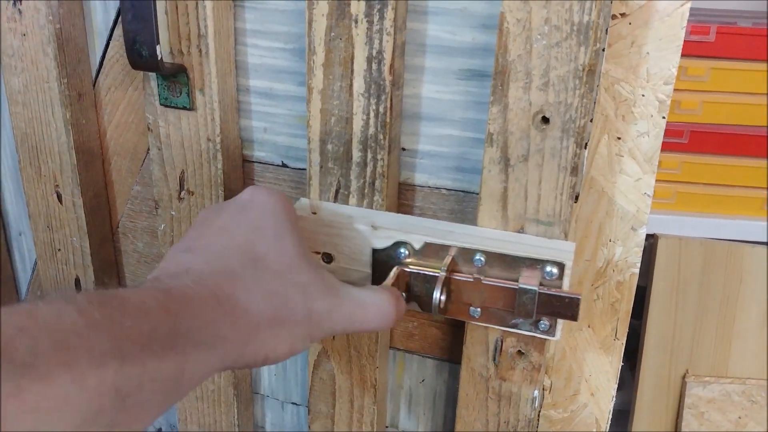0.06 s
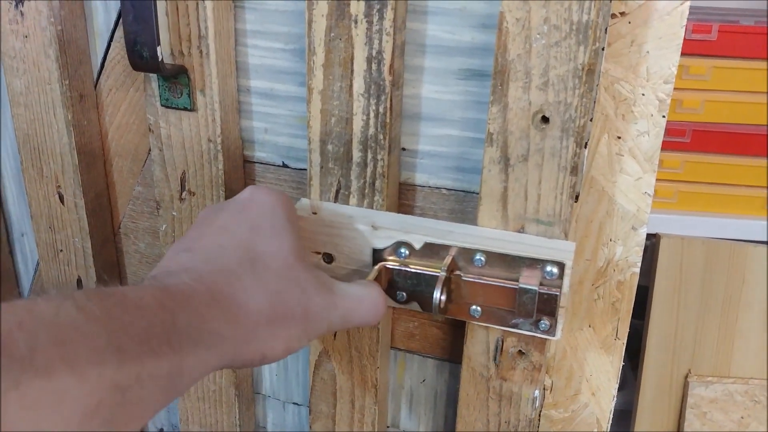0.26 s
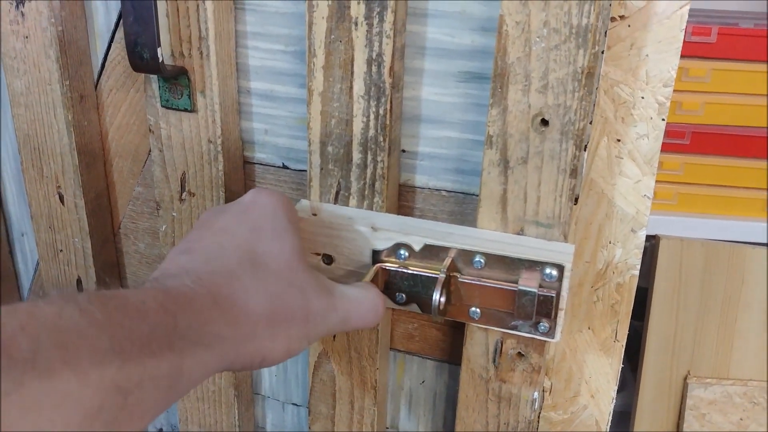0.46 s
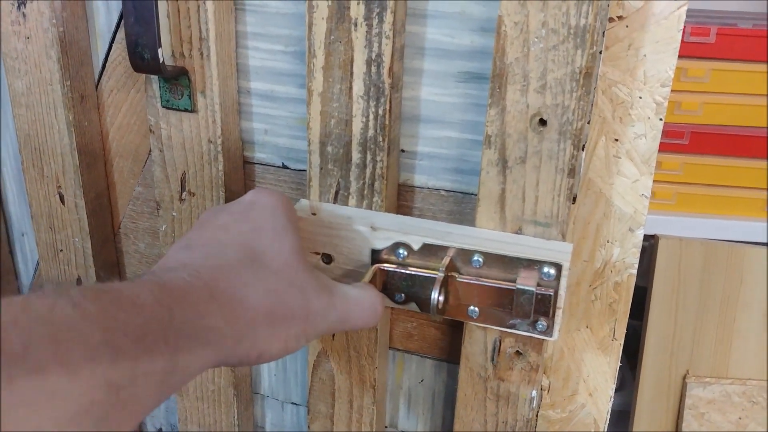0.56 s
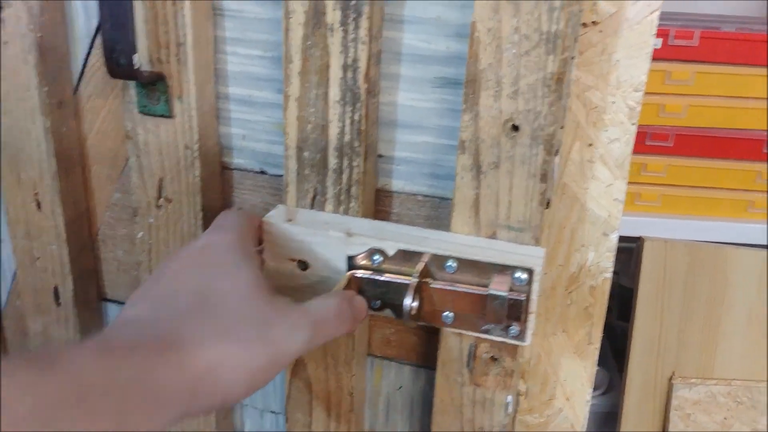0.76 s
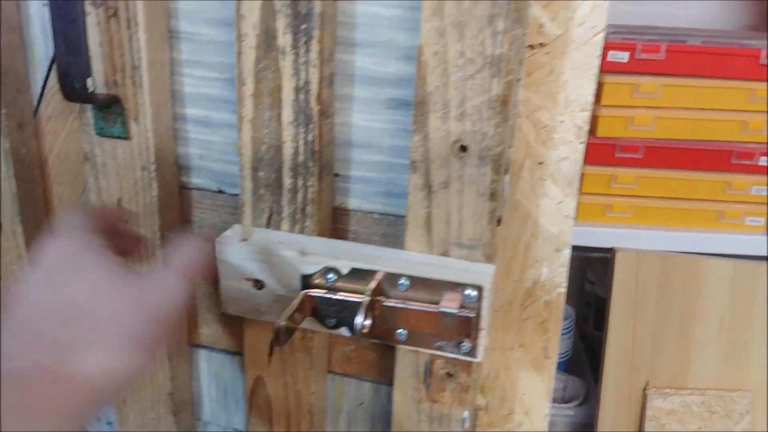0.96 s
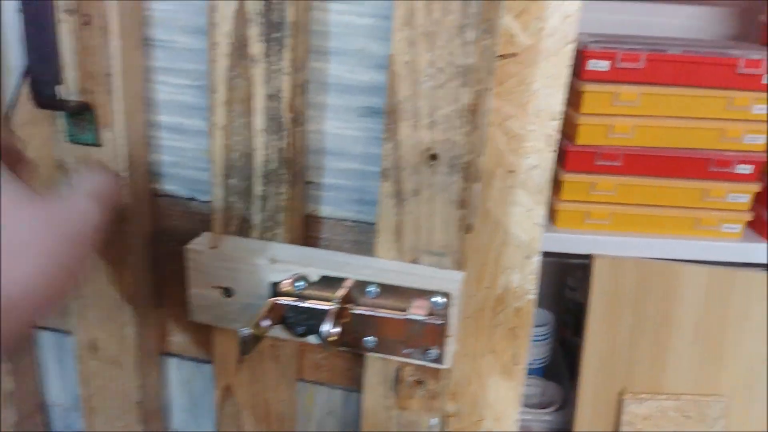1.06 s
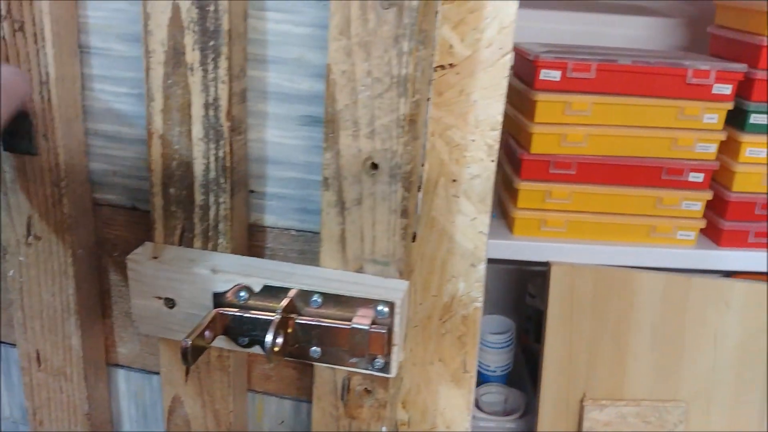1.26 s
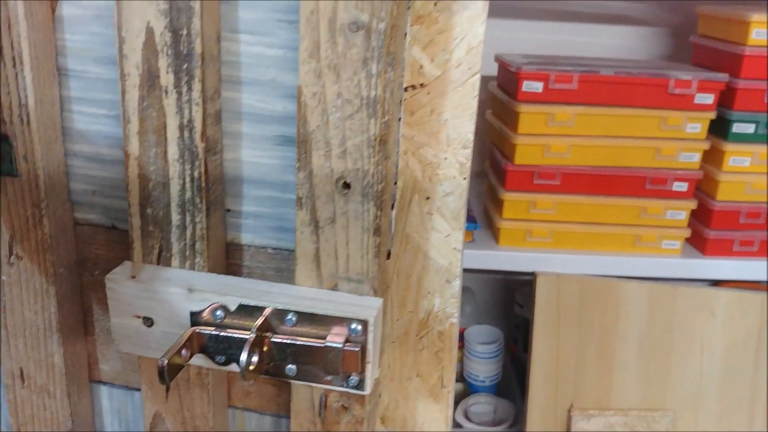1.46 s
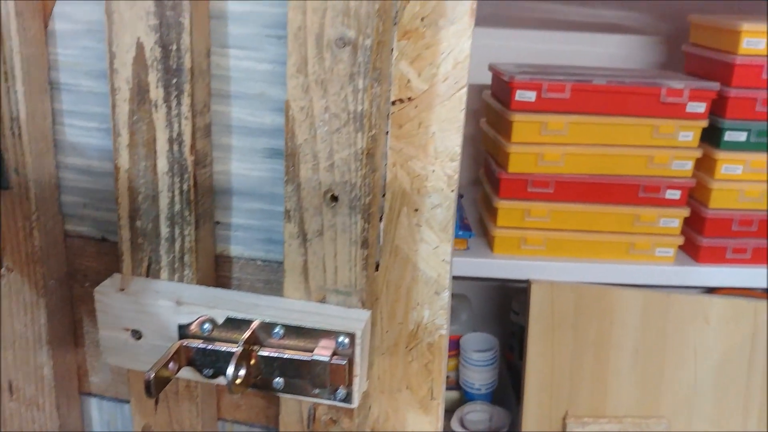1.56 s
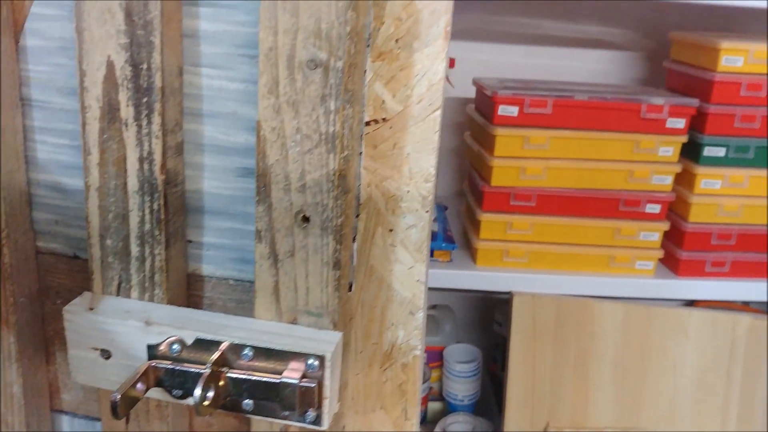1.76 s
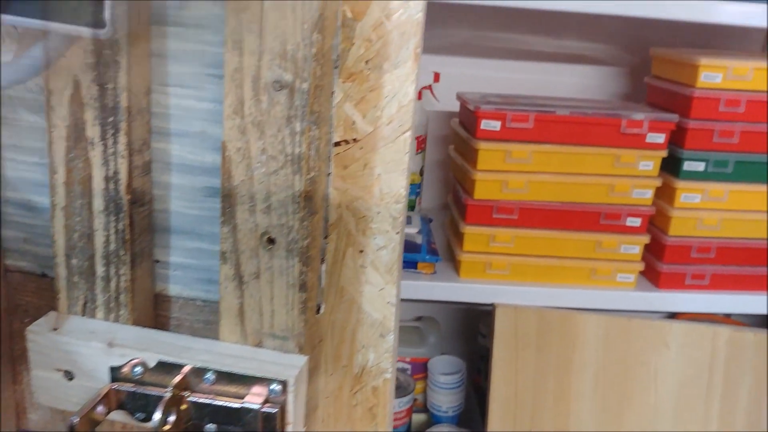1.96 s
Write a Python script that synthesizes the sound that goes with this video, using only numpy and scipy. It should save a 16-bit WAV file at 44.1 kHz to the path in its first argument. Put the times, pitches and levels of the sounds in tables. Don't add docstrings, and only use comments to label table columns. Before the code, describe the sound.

Metal door bolt slid by hand, rattling, one loud slam, faint knocks, and a final clack

```python
import sys
import numpy as np
from scipy import signal
from scipy.fft import rfft, irfft
from scipy.io import wavfile
from scipy.ndimage import map_coordinates

SR = 44100
rng = np.random.default_rng(int(sys.argv[2]) if len(sys.argv) > 2 else 0)


def attenuation_scalar(level_db):
    decades = np.asarray(level_db, float) / 20
    return 10 ** decades


def unload_audio(sound):
    columns = np.transpose(np.atleast_2d(sound))
    steps = np.round(np.clip(columns, -1, 1) * 32767)
    wavfile.write(sys.argv[1], SR, steps.astype(np.int16))


N = 88200
T = np.arange(N) / SR

# (start [s], rise [s], time to fade by 60 dB [s], level [dB])
SCRAPE_EVENTS = [(.0, 0.0022, 0.037, -29), (.008, 0.011, 0.1, -22.5), (.02, 0.0087, 0.051, -27.5),
                 (.034, 0.0089, 0.024, -28.5), (.046, 0.012, 0.03, -25.5), (.064, 0.006, 0.039, -34),
                 (.074, 0.01, 0.047, -37), (.177, 0.017, 0.044, -26), (.198, 0.0031, .06, -29.5),
                 (.2185, 0.0072, 0.07, -26), (.24, 0.016, 0.062, -37), (.325, .008, 0.055, -48)]
THUD_EVENTS = [(.005, 0.06, 0.1, -47.5), (.035, 0.026, .12, -46), (.203, 0.0078, .05, -31),
               (.226, 0.012, 0.06, -35.5), (.33, 0.012, .04, -47.5), (.42, 0.0058, 0.07, -29),
               (.478, 0.02, .1, -32.5), (.64, 0.019, 0.057, -49.5), (1.308, 0.0096, 0.051, -49.5),
               (1.655, 0.01, 0.053, -58), (1.969, .003, 0.038, -27.5)]
JINGLE_EVENTS = [
    (.012, 0.0067, .06, -43.5),
    (.026, .005, .06, -37),
    (.045, 0.0046, .04, -42.5),
    (.176, 0.019, .05, -40),
    (.212, 0.0027, .06, -43.5),
    (.322, 0.0049, .04, -47.5),
]
TAP_EVENTS = [
    (.0128, 0.00097, 0.008, -29.5),
    (.031, 0.00056, .008, -42.5),
    (.051, 0.0015, 0.0094, -43.5),
    (.185, 0.0016, 0.0078, -39),
    (.1945, 0.00064, .01, -38.5),
    (.2213, .0004, 0.007, -33.5),
    (.234, .0005, 0.0087, -45),
    (.3305, 0.00025, .01, -58.5),
]
BUMP_EVENTS = [
    (.056, 0.0007, 0.016, -37),
    (.189, .001, 0.026, -38.5),
    (.2275, 0.0012, 0.013, -38),
    (.4195, 0.00086, 0.014, -20.5),
    (.4385, 0.0015, 0.025, -27.5),
    (.4565, 0.0018, 0.0075, -28.5),
    (1.648, 0.00079, .01, -64),
]
CRACK_EVENTS = [
    (.2213, 0.00018, 0.0013, -31.5),
    (.4172, 0.00035, 0.014, -4),
    (1.9688, 0.00032, 0.00053, -22.5),
]
SLAM_EVENTS = [
    (.409, .008, 0.02, -29),
    (.4178, 0.00095, 0.028, -8.5),
    (.426, 0.0043, 0.031, -11.5),
    (.437, 0.0057, 0.046, -16.5),
    (.455, 0.0037, 0.071, -12),
]
SETTLE_EVENTS = [
    (.75, 0.051, 0.25, -51),
]
KNOCK_EVENTS = [
    (1.289, 0.0026, 0.039, -44.5),
    (1.297, .002, 0.032, -38),
    (1.302, 0.0016, 0.043, -57.5),
    (1.314, .004, 0.058, -43),
]
TICK_EVENTS = [
    (1.647, 0.002, 0.077, -49.5),
    (1.657, 0.0074, 0.047, -52),
    (1.666, .004, 0.065, -53.5),
    (1.68, 0.0065, 0.097, -58),
    (1.71, 0.0045, 0.071, -69),
]
CLACK_EVENTS = [
    (1.9645, 0.0025, 0.015, -64),
    (1.9688, 0.00047, 0.0107, -23),
    (1.973, 0.00095, 0.04, -22),
    (1.989, 0.0059, 0.044, -26.5),
]

# (frequency [Hz], level [dB])
SCRAPE_COLOUR = [(80, -33.5), (420, -1), (690, 6.5), (1150, -12), (2000, -6), (3000, -15.5), (4300, -19),
                 (16000, -41)]
THUD_COLOUR = [(40, -30), (75, -3), (130, 3), (190, -8), (270, -3.5), (380, -2), (700, -15.5), (1500, -40)]
JINGLE_COLOUR = [(1500, -19), (2200, -21), (6000, -26), (7000, 3.5), (8000, -1), (9300, -28.5)]
TAP_COLOUR = [(900, -24.5), (1900, 3), (2400, -6.5), (3000, -6), (5000, -20.5), (9000, -33.5)]
BUMP_COLOUR = [(250, -29.5), (600, 6), (1000, -5.5), (1500, -17.5), (4000, -38.5)]
CRACK_COLOUR = [(300, -11.5), (700, 1), (3500, 1.5), (8200, -2), (11500, -26.5), (15000, -32)]
SLAM_COLOUR = [(200, -23.5), (380, -4.5), (500, -16), (660, -1.5), (1050, -4), (1750, -16.5), (2850, -4),
               (4500, -20.5), (5500, -21), (16000, -48.5)]
SETTLE_COLOUR = [(100, -4), (380, 3.5), (1000, -9), (1870, -16), (3000, -12.5), (9000, -29.5)]
KNOCK_COLOUR = [(60, -15), (135, -21), (400, -13), (600, 6), (1250, -4), (1750, -12.5), (2600, -30),
                (9000, -34)]
TICK_COLOUR = [(100, 11), (400, -2.5), (760, 1.5), (1200, -1.5), (2200, -3), (2800, -7), (3500, -18),
               (5000, -12), (7500, -37)]
CLACK_COLOUR = [(100, 0), (250, -8), (860, 2), (1700, -13), (2500, -10.5), (3900, -19.5), (7700, -22.5),
                (16000, -42.5)]

# (frequency [Hz], level [dB], time to fade by 60 dB [s])
GUIDE_NOTES = [(435, -5, 0.2), (690, 0, 0.2), (915, -5, 0.3), (1380, -7, 0.3), (1990, -5, 0.15),
               (2270, -9, .15), (2870, -7, 0.2), (3550, -14, 0.12), (4960, -17, 0.1), (7400, -14, .15),
               (7800, -12, .3)]
WALL_NOTES = [(76, -9, .3), (115, -9, .08), (133, 0, .1), (268, -5, .08), (375, -1, .08)]
PIN_NOTES = [(7400, -5.5, .04), (7430, 0, 0.05), (7970, 2, 0.12), (7854, -8, .04)]
KNOB_NOTES = [(1940, 2.5, 0.095), (2290, -2, 0.049), (3130, -8.5, .04)]
BLOCK_NOTES = [(590, -4, 0.044), (695.6, 7, 0.18), (970, -5, .05), (1015, -5.5, .05)]
LATCH_NOTES = [(475, 3.5, 0.42), (859, -2, 0.055), (2500, -7, .03), (5080, -11.5, 0.032),
               (7080, -16, 0.059)]
FRAME_NOTES = [(273, -7, .4), (386, 0, 0.21), (654, 4, 0.75), (682.4, 4, 0.2), (918, 1, 0.3),
               (1010, -0.5, 1), (1078, -2.5, 1), (1388, -0.5, 0.3), (2618, -7.5, 0.81), (2890, -8, 0.54),
               (3000, -2, .5), (3150, -6, 0.54)]
BOARD_NOTES = [(600, -1, .05), (760, 0, .05), (1035, -3, .05), (1200, -1, .05), (1600, -6, .04),
               (8810, -26, .4)]
SHELF_NOTES = [(290, -8, 0.1), (760, 3, .1), (2180, -3, 0.2), (2700, -4, 0.1), (4100, -16.5, 0.11)]

# (frequency [Hz], near-wall 60 dB fade [s], late-tail 60 dB fade [s],
# late-tail level [dB], likeness of the two ports [0-1])
SHED_ECHO = [(61, 0.3, .9, -11, 0.8), (128, 0.11, .8, -7.5, 1), (246, 0.25, .85, -14, 0),
             (820, 0.19, 0.8, -18.5, 0.4), (2800, 0.23, 0.65, -15.5, 0.1), (6000, 0.28, 0.6, -26, 0.8),
             (14000, 0.19, 0.26, -38, 1)]
# (frequency [Hz], level [dB])
AIR_COLOUR = [(15, -57), (25, -18.5), (59, -15.5), (97, -6), (185, -22), (416, -21), (1190, -30.5),
              (1610, -30), (16000, -41.5)]
# (frequency [Hz], level [dB])
RIGHT_PORT_COLOUR = [(5000, 1), (8000, -6.5), (12000, -1.5)]
# (frequency [Hz], level [dB])
FINAL_COLOUR = [(9000, 0), (9800, -22), (10900, -22), (11500, 0), (14900, 3), (15500, -14), (16300, -22),
                (16700, -70)]


def unit(x):
    return x / np.sqrt(np.mean(x ** 2))


def unit_energy(h):
    return h / np.sqrt(np.sum(h ** 2))


def curve(table, hz, axis=1):
    table = np.array(table, float)
    return np.interp(np.log(np.maximum(hz, 1)), np.log(table[:, 0]), table[:, axis])


def balance(left_db):
    return attenuation_scalar(np.array([[.5], [-.5]]) * left_db)


def response(colour, size=4096):
    hz = np.arange(size // 2 + 1) * SR / size
    ceps = irfft(np.log(attenuation_scalar(curve(colour, hz))))
    ceps[1:size // 2] *= 2
    ceps[size // 2 + 1:] = 0
    return unit_energy(irfft(np.exp(rfft(ceps))))


def ring(modes, shorten):
    t = T[:SR // 2]
    h = 0
    for hz, db, t60 in modes:
        fade = attenuation_scalar(-60 * t / max(t60 * shorten, .004))
        h = h + attenuation_scalar(db) * np.sin(2 * np.pi * hz * t) * fade / np.sqrt(t60)
    return unit_energy(h)


def shed(size=32768):
    build_s, left_db = 0.00067, 6.5
    t = T[:size]
    f = np.arange(size // 2 + 1.) * SR / size
    noise = rfft(rng.standard_normal((3, size)))
    out = 0
    for hz in 40 * 2 ** np.arange(0, 8.9, 1 / 3):
        band = np.exp(-(np.log2(np.maximum(f, 1) / hz) * 4) ** 2)
        same, a, b = irfft(noise * band)
        like = np.clip(curve(SHED_ECHO, hz, axis=4), 0, 1)
        near = attenuation_scalar(-60 * t / curve(SHED_ECHO, hz))
        late = attenuation_scalar(curve(SHED_ECHO, hz, axis=3) - 60 * t / curve(SHED_ECHO, hz, axis=2))
        ports = np.sqrt(like) * same + np.sqrt(1 - like) * np.array([a, b])
        out = out + (near + late) * ports
    out = out * (1 - np.exp(-t / build_s))
    return out / np.sqrt(np.sum(out ** 2) / 2) * balance(left_db)


def contact(rows, colour, modes, ring_db, shorten, click_db, left_db, shed_db):
    grain_db, spread, spread_hz = 1.5, 0.91, 370
    push = 0
    for start, rise, fall, db in rows:
        swell = np.clip((T - start) / rise, 0, 1) ** 2
        fade = attenuation_scalar(-60 * np.clip(T - start - rise, 0, 9) / fall)
        push = push + attenuation_scalar(db) * swell * fade
    grit = unit(rng.standard_normal(N) * attenuation_scalar(grain_db * rng.exponential(size=N)))
    force = push * np.array([grit, grit[::-1]])
    for start, rise, _, db in rows:
        force[:, int((start + rise) * SR)] += attenuation_scalar(db + click_db)

    body = attenuation_scalar(ring_db) * ring(modes, shorten)
    broad = response(colour)
    body[:len(broad)] += broad
    x, other = signal.fftconvolve(force, body[None], axes=1)[:, :N]

    difference = np.sqrt(spread) * other - (1 - np.sqrt(1 - spread)) * x
    apart = signal.lfilter(*signal.butter(1, spread_hz, "high", fs=SR), difference)
    direct = np.array([x, x + apart]) * balance(left_db)
    echo = signal.fftconvolve(x[None], shed(), axes=1)[:, :N]
    return direct + attenuation_scalar(shed_db) * echo


def air():
    level_db, left_db, like_hz = -68.5, 4, 600
    f = np.arange(N // 2 + 1) * SR / N
    same, a, b = rfft(rng.standard_normal((3, N)))
    like = 1 / (1 + (f / like_hz) ** 2)
    ports = np.sqrt(like) * same + np.sqrt(1 - like) * np.array([a, b])
    x = irfft(attenuation_scalar(curve(AIR_COLOUR, f)) * ports, N) * balance(left_db)
    return x / np.sqrt(np.mean(x.mean(0) ** 2)) * attenuation_scalar(level_db)


def scrapes():
    return contact(SCRAPE_EVENTS, SCRAPE_COLOUR, GUIDE_NOTES, ring_db=-3.0, shorten=.17,
                   click_db=-20.5, left_db=7.5, shed_db=-11.5)


def thuds():
    return contact(THUD_EVENTS, THUD_COLOUR, WALL_NOTES, ring_db=4.5, shorten=1.0,
                   click_db=2, left_db=7, shed_db=-12.5)


def jingles():
    return contact(JINGLE_EVENTS, JINGLE_COLOUR, PIN_NOTES, ring_db=-6.5, shorten=1.0,
                   click_db=5.5, left_db=13.5, shed_db=-13)


def taps():
    return contact(TAP_EVENTS, TAP_COLOUR, KNOB_NOTES, ring_db=4, shorten=1.0,
                   click_db=22, left_db=10, shed_db=-10.5)


def bumps():
    return contact(BUMP_EVENTS, BUMP_COLOUR, BLOCK_NOTES, ring_db=3, shorten=1.0,
                   click_db=22, left_db=3.5, shed_db=-8)


def cracks():
    return contact(CRACK_EVENTS, CRACK_COLOUR, LATCH_NOTES, ring_db=-21.5, shorten=0.9,
                   click_db=11.5, left_db=0.0, shed_db=-8)


def slam():
    return contact(SLAM_EVENTS, SLAM_COLOUR, FRAME_NOTES, ring_db=-9.5, shorten=.2,
                   click_db=10.5, left_db=-2.0, shed_db=-1.5)


def settle():
    return contact(SETTLE_EVENTS, SETTLE_COLOUR, FRAME_NOTES, ring_db=-35, shorten=0.16,
                   click_db=-6, left_db=4.5, shed_db=-7.0)


def knock():
    return contact(KNOCK_EVENTS, KNOCK_COLOUR, BOARD_NOTES, ring_db=-6.5, shorten=.45,
                   click_db=18, left_db=7.0, shed_db=-12.5)


def tick():
    return contact(TICK_EVENTS, TICK_COLOUR, SHELF_NOTES, ring_db=-4, shorten=.25,
                   click_db=0, left_db=5.0, shed_db=-12.0)


def clack():
    return contact(CLACK_EVENTS, CLACK_COLOUR, LATCH_NOTES, ring_db=-3.5, shorten=0.72,
                   click_db=10.5, left_db=7.5, shed_db=-3)


def scene():
    port_lag_s = 0.00011
    left, right = (scrapes() + thuds() + jingles() + taps() + bumps() + cracks()
                   + slam() + settle() + knock() + tick() + clack())
    right = map_coordinates(right, [(T - port_lag_s) * SR], mode="nearest")
    shade = response(RIGHT_PORT_COLOUR, size=512)
    right = signal.fftconvolve(right, shade / shade.sum())[:N]
    final = response(FINAL_COLOUR, size=512)
    return signal.fftconvolve(np.array([left, right]), final[None], axes=1)[:, :N] + air()


def top_cut(x):
    return signal.sosfilt(signal.butter(12, 16390, fs=SR, output="sos"), x)


def record(dry):
    rumble_hz, top_hz = 66.67, 16200
    limit, knee = .99, 4
    x = signal.sosfilt(signal.butter(4, rumble_hz, "high", fs=SR, output="sos"), dry)
    x = x / (1 + np.abs(x / limit) ** knee) ** (1 / knee)
    x = signal.sosfilt(signal.ellip(8, .2, 60, top_hz, fs=SR, output="sos"), x)
    return top_cut(x)


dry = scene()
out = record(dry)
unload_audio(out)
```